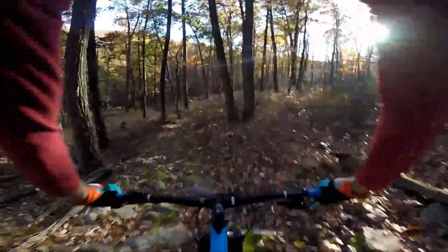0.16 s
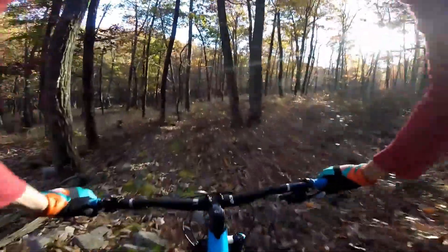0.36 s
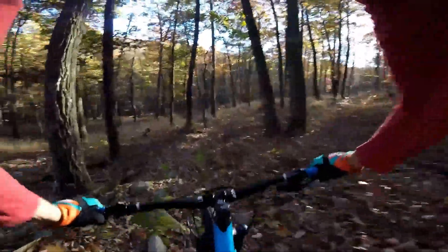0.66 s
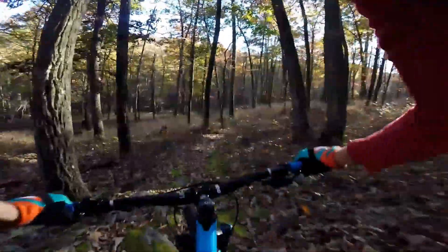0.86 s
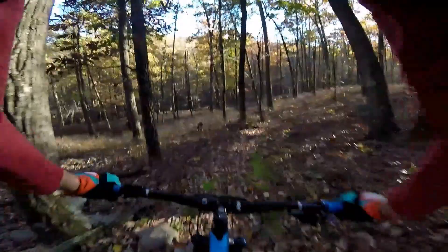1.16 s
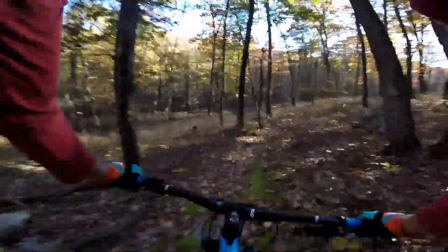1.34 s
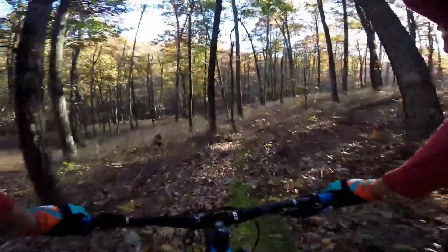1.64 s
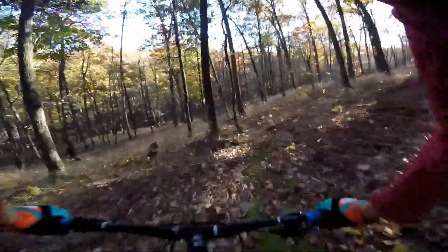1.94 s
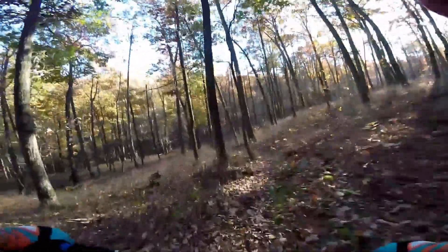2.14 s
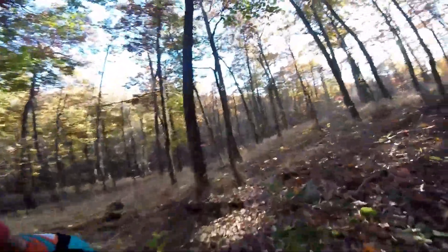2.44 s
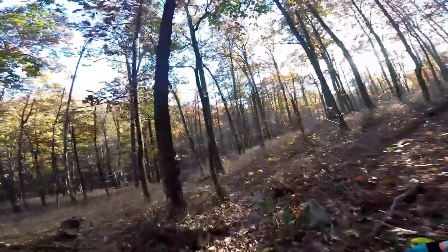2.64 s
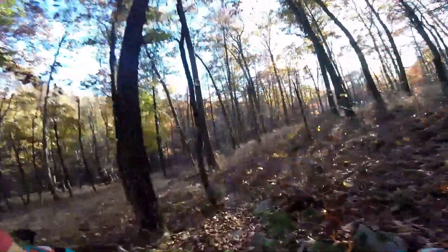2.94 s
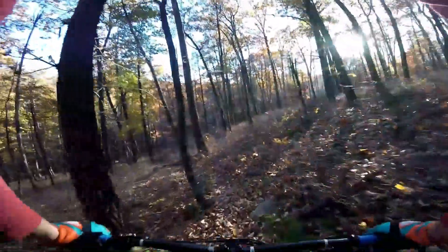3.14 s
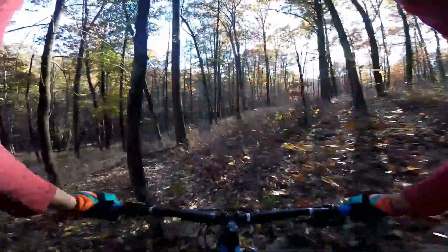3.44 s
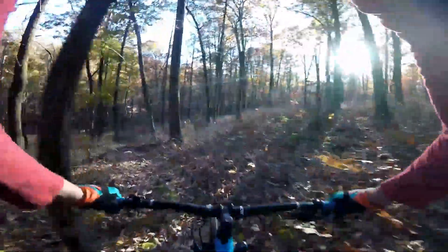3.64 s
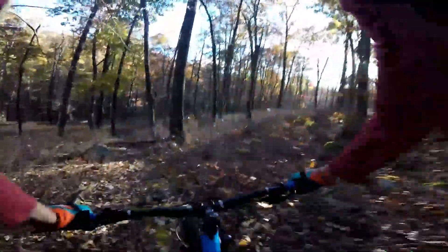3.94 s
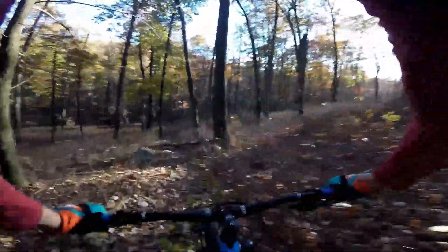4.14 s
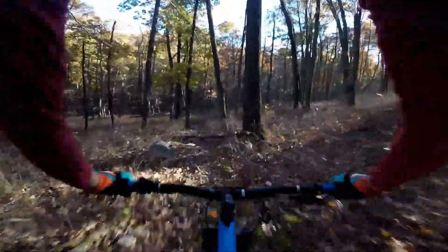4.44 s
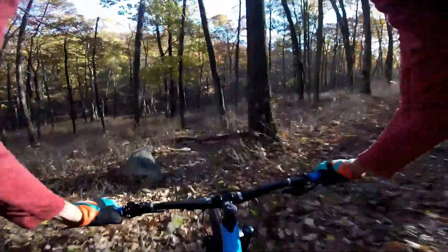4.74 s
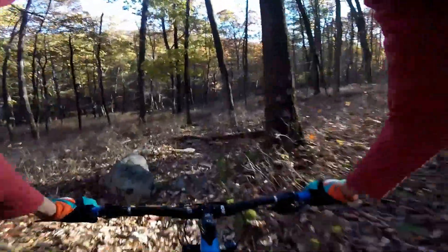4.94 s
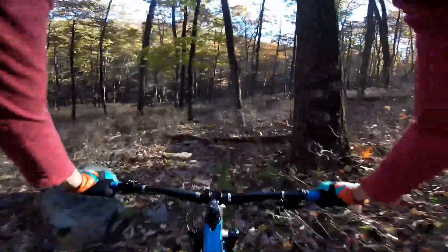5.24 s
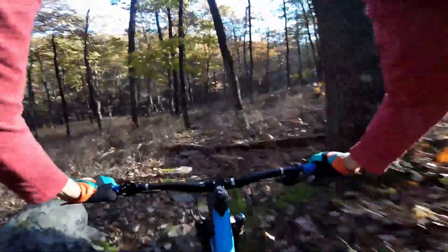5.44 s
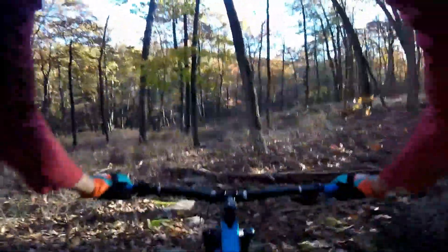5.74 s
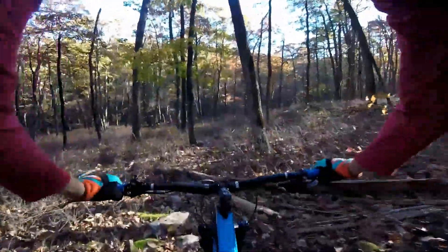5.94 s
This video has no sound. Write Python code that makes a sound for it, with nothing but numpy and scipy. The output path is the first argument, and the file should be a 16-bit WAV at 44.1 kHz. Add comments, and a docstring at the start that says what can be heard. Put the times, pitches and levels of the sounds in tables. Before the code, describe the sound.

A mountain bike descends a rough woodland trail, heard from the rider's chest. Deep, fluttering wind gusts press on the microphone over a dull shaking. Brittle leaves crackle in irregular surges with snapping twigs, gritty scuffs and pattering soil. Early crunching is dense, the middle is lighter with more low thumps, and later come clustered wheel knocks and sharp leafy bursts, with a light frame rattle.

```python
"""Wind buffets the microphone over a low shaking, then tyres crunch down a rocky forest trail in dry leaves.
The place is heard from the chest of a mountain biker, with tyres, bike and wind all close to one microphone.
Leaves, stalks, soil and grit are showers of random clicks ringing in filter bands; twigs, knocks and bumps
are short damped tones mixed with noise; chain and cables are tapped resonances.
Headwind is deep filtered noise, and each gust a swell of a wandering low tone."""
import sys
import numpy as np
from scipy import signal
from scipy.fft import rfft, irfft, next_fast_len
from scipy.io import wavfile
from scipy.ndimage import uniform_filter1d

SR = 44100
rng = np.random.default_rng(int(sys.argv[2]) if len(sys.argv) > 2 else 0)


def bounce(signal):
    """Save signal as a 16-bit WAV file at the path given by the first command-line argument."""
    frames = np.transpose(np.atleast_2d(signal))
    limited = np.clip(frames, -1, 1)
    pcm = np.round(limited * 32767).astype(np.int16)
    wavfile.write(sys.argv[1], SR, pcm)


N = 268613  # length [samples]

# All levels are relative: a layer may trim or filter them further.
# Widths run from the middle of a swell to where its gain has fallen to exp(-2).

# steady headwind: (time [s], level [dB])
WIND_LEVEL = [(0, -42.5), (.8, -33), (1.7, -38.5), (2.3, -31.5), (2.9, -37), (3.35, -37.5), (3.7, -35.5),
              (4.3, -32.5), (4.8, -31), (5.3, -32.5), (5.95, -38.5), (6.09, -44)]
# wind eddies: (frequency [Hz], density [dB per Hz])
WIND_SPECTRUM = [(5, -11), (14, 7), (24, 1.5), (31, -12.5), (42, -5), (65, -7), (105, -16.5), (160, -32.5),
                 (400, -73.5)]
# gusts buffet the microphone: (middle [s], level [dB], width [s])
GUST_SWELLS = [(.092, -25, 0.13), (.295, -19, 0.019), (.486, -27.5, 0.081), (.87, -32, .05),
               (.997, -22, 0.049), (1.176, -20.5, 0.054), (1.359, -19, 0.045), (1.52, -30.5, 0.14),
               (1.759, -24, 0.09), (1.883, -26, .07), (2.04, -21, .035), (2.11, -18.5, 0.018),
               (2.439, -24.5, 0.057), (2.58, -20, 0.055), (2.644, -27, 0.028), (2.822, -22, 0.06),
               (2.974, -20.5, .026), (3.073, -22, 0.026), (3.147, -21, 0.086), (3.567, -23.5, 0.065),
               (3.693, -16, 0.031), (4.02, -20.5, 0.079), (4.13, -22, 0.037), (4.465, -22, 0.026),
               (4.59, -22.5, 0.068), (4.637, -20.5, 0.065), (4.69, -18, 0.065), (4.758, -23, 0.031),
               (4.96, -29, 0.049), (5.089, -20.5, .055), (5.31, -26, 0.036), (5.45, -27.5, 0.13),
               (5.616, -16.5, 0.028), (5.73, -28, .05)]
GUST_HZ, GUST_WANDER_OCTAVES = 34.9, 0.5  # central pitch, spread of its wander

# shaking of frame and rider: (time [s], level [dB])
RUMBLE_LEVEL = [(0, -29), (.8, -50), (1.02, -23), (1.27, -38), (1.65, -30.5), (2.1, -36), (2.5, -35),
                (2.85, -40), (3.4, -30), (3.85, -35.5), (4.4, -26.5), (5.3, -31.5), (5.65, -41.5),
                (5.97, -45), (6.06, -24)]
# shaking of frame and rider: (frequency [Hz], density [dB per Hz])
RUMBLE_SPECTRUM = [(40, -8.5), (100, 4), (150, -1.5), (200, -10.5), (245, -1), (310, -24), (600, -16),
                   (3000, -104)]

# how hard the rolling tyres churn the leaves: (time [s], crunch level [dB])
ROLLING_CRUNCH = [(0.0, -41.5), (0.13, -30), (0.32, -41.5), (0.5, -29), (0.86, -39.5), (0.9, -35),
                  (1.44, -31), (1.64, -42), (1.87, -31.5), (2.29, -36.5), (2.63, -39.5), (3.68, -35),
                  (4.18, -35), (4.45, -37), (4.85, -38.5), (5.37, -30.5), (5.51, -41), (5.85, -45),
                  (5.93, -46), (6.0, -41), (6.09, -42.5)]
# a tyre ploughs into a heap of leaves: (middle [s], level [dB], width [s])
LEAF_HEAPS = [(.151, -40, 0.0099), (.414, -30, 0.032), (.519, -30.5, 0.072), (.61, -28.5, 0.03),
              (.925, -29.5, 0.031), (.975, -27.5, 0.054), (1.104, -27, 0.04), (1.168, -25, 0.023),
              (1.42, -28.5, 0.033), (1.482, -27, 0.019), (1.699, -27, 0.051), (1.858, -27.5, 0.035),
              (2.029, -31, 0.046), (2.1, -30, 0.018), (2.206, -29, 0.02), (2.342, -30.5, 0.055),
              (2.505, -33.5, 0.062), (2.79, -50, 0.047), (2.955, -34, 0.14), (3.148, -35, 0.028),
              (3.23, -34, 0.025), (3.32, -37.5, 0.032), (3.395, -35, 0.019), (3.485, -27.5, 0.021),
              (3.604, -33.5, 0.17), (3.769, -27, 0.031), (3.931, -28, 0.026), (4.018, -26.5, 0.021),
              (4.048, -27, 0.025), (4.357, -23.5, 0.011), (4.395, -29, 0.029), (4.437, -36, 0.018),
              (4.632, -27.5, 0.052), (4.693, -29.5, 0.012), (4.756, -26, 0.0079), (4.925, -29, 0.041),
              (5.055, -26.5, 0.013), (5.137, -29, 0.032), (5.26, -30, 0.081), (5.602, -24.5, 0.036),
              (5.69, -33.5, 0.24), (5.807, -27, 0.02), (6.018, -33, 0.02)]
# dry leaves: (frequency [Hz], density [dB per Hz])
LEAF_SPECTRUM = [(500, -6), (1250, -8.5), (1650, -2), (2350, -1.5), (3100, -2.5), (4200, -5), (4900, -2.5),
                 (6000, -8.5), (7100, -5.5), (8800, -12.5), (10400, -13.5), (11800, -30), (13500, -24),
                 (16000, -35)]
# treble of the crunch: (time [s], gain [dB])
CRUNCH_TREBLE = [(0, -4), (.6, -3), (.8, -8), (1.05, -3), (1.8, -2), (2.3, -5), (3.3, -2.5), (3.65, 1),
                 (4.0, -4.5), (4.18, -2), (5.0, -1.5), (6.09, -2)]
# patches where the leaves thin out: (middle [s], bareness [dB against fully bare], width [s])
BARE_PATCHES = [(.835, -7, 0.027), (1.605, -5, 0.02), (3.36, -6, 0.027), (4.271, -5, .028),
                (4.514, -4, .022), (5.492, -15, 0.013)]
BARE_DB, BARE_TREBLE_DB = -4.5, -23  # fully bare: change of rolling crunch, further change of all treble
RUSTLE_SHARE = 0.35  # smooth rustle beside the cracks of the rolling tyres

# soil and gravel: (frequency [Hz], density [dB per Hz])
GROUND_SPECTRUM = [(90, -15.5), (180, 2.5), (250, 1.5), (400, 1), (700, -4), (1050, -7.5), (1400, -15.5),
                   (6000, -61)]
USUAL_CRUNCH_DB = -36
GROUND_DB, GROUND_FOLLOWS = -44, 0.84  # soil at the usual crunch; its share of the crunch's swing in dB

# chain, cables and frame: (frequency [Hz], strength [dB], t60 [s])
RATTLE_RESONANCES = [(1039, 13.5, 0.044), (2100, 21.5, 0.032), (2326, 24, 0.033), (2657, 15, 0.067)]

# stones and roots knock on the wheels: (time [s], level [dB], pitch at the crest [Hz], t60 [s])
WHEEL_KNOCKS = [(0.145, -26.5, 1030, 0.019), (.242, -27, 378, 0.0055), (0.786, -23.5, 309, 0.022),
                (1.008, -26, 464, 0.0069), (1.066, -29, 264, 0.025), (1.3231, -17, 680, 0.0053),
                (1.472, -19, 207, 0.02), (1.767, -28, 336, 0.0067), (2.1905, -18.5, 560, 0.0038),
                (2.504, -35, 385, 0.0089), (2.805, -27.5, 217, 0.013), (3.053, -33.5, 195, 0.026),
                (3.342, -27, 323, 0.012), (3.391, -25.5, 357, 0.0095), (3.394, -32, 252, 0.039),
                (3.759, -28, 416, 0.0092), (3.904, -25, 774, 0.0049), (3.937, -23.5, 368, 0.0071),
                (4.354, -24.5, 434, 0.0056), (4.44, -24.5, 355, 0.02), (4.555, -26, 437, 0.0074),
                (4.687, -25, 780, 0.0049), (4.748, -19, 393, 0.0081), (4.7616, -15, 540, 0.0063),
                (4.764, -26.5, 273, 0.0355), (4.902, -21, 398, 0.006), (4.963, -29, 222, 0.017),
                (5.333, -25.5, 473, 0.015), (5.393, -29, 433, 0.0055), (5.597, -28.5, 276, 0.028),
                (5.818, -26, 517, 0.0048), (5.8204, -26, 1250, 0.0037), (5.8208, -17, 363, 0.0077),
                (5.823, -27.5, 221, 0.026), (6.031, -29.5, 480, 0.0097), (6.066, -30, 348, 0.01)]

# twigs snap: (time [s], level [dB], pitch at the crest [Hz], t60 [s])
TWIG_SNAPS = [(.2877, -32, 2200, 0.0053), (.409, -21.5, 1730, 0.0057), (0.412, -19, 5230, 0.0021),
              (.42, -25, 5440, 0.0019), (0.468, -24, 1980, .014), (.541, -23, 2770, 0.0041),
              (0.788, -34, 2100, 0.0064), (.8165, -38, 2100, .004), (0.8968, -24, 1820, 0.0066),
              (0.9247, -19.5, 1970, 0.006), (0.971, -19.5, 2680, 0.0047), (1.006, -24, 2340, 0.0061),
              (1.0668, -32, 1990, 0.0044), (1.1632, -20, 2180, 0.0048), (1.169, -32, 3620, 0.0014),
              (1.2764, -25.5, 2280, 0.0044), (1.405, -24, 5550, 0.0016), (1.4275, -25.5, 1800, 0.0083),
              (1.4835, -21.5, 6530, .002), (1.5748, -28, 2440, 0.0062), (1.646, -27.5, 2380, 0.0035),
              (1.6957, -21, 2300, 0.0047), (1.7388, -27.5, 2190, .004), (1.7842, -29, 2390, 0.0036),
              (2.0805, -29, 3470, 0.0032), (2.1535, -27, 2000, .004), (2.1921, -25.5, 2120, 0.0056),
              (2.2543, -29, 5000, 0.0014), (2.6797, -33, 2340, 0.0051), (2.7122, -30, 5200, .002),
              (2.7586, -28, 2200, 0.0037), (2.772, -29, 4800, 0.0022), (2.8119, -25.5, 1980, 0.0066),
              (2.991, -25.5, 2340, 0.0075), (3.1596, -26, 2220, 0.0041), (3.1698, -30, 5000, 0.0023),
              (3.3072, -23, 2140, 0.0031), (3.546, -26.5, 2280, 0.0032), (3.6086, -24.5, 2200, 0.0041),
              (3.76, -21.5, 2360, 0.0029), (3.904, -23, 2600, 0.0027), (3.9276, -27, 5000, 0.0029),
              (4.0122, -21, 3300, 0.0043), (4.041, -21.5, 3450, .006), (4.05, -22, 3400, 0.0057),
              (4.1558, -29, 2100, 0.0043), (4.2985, -32, 2300, 0.012), (4.355, -24, 2070, 0.0044),
              (4.687, -28, 1700, 0.0043), (4.7485, -33, 1800, 0.0045), (4.756, -30, 5550, 0.0026),
              (4.7592, -33, 2500, 0.0037), (5.013, -26, 1700, 0.011), (5.137, -28, 2820, 0.0041),
              (5.5727, -28, 2300, 0.0037), (5.595, -20, 1730, 0.0055), (5.604, -22, 2600, 0.0022),
              (5.8568, -35, 2370, .005), (6.0158, -26.5, 5900, .006)]

# a tyre grinds through dry stalks: (middle [s], level [dB], width [s])
STALK_SWELLS = [(.513, -28.5, .022), (.588, -31, .022), (.947, -29, 0.02), (.99, -33.5, .03),
                (1.103, -32, .018), (1.176, -29, 0.0092), (1.705, -28.5, 0.038), (1.862, -30, 0.059),
                (2.103, -33, 0.04), (2.34, -33.5, .025), (2.941, -31, 0.019), (3.158, -32, 0.052),
                (3.608, -35, 0.044), (4.154, -39, 0.022), (4.926, -39, .03), (5.29, -31, 0.058),
                (5.358, -30, .018)]
STALK_LOW_HZ, STALK_TOP_HZ = 1460, 2610

# a tyre scuffs over grit: (middle [s], level [dB], width [s])
GRIT_SCUFFS = [(.635, -34.5, 0.03), (1.85, -37, 0.046), (2.34, -52, 0.021), (3.87, -39, 0.024),
               (4.04, -37, 0.024), (4.44, -39.5, 0.03), (4.69, -37, 0.017), (4.98, -38.5, 0.034),
               (5.28, -41, 0.065)]

# bumps that reach the rider's body: (time [s], level [dB], pitch at the crest [Hz])
BODY_BUMPS = [(0.957, -38, 104), (1.549, -21, 84), (1.649, -23, 92), (1.974, -23, 102), (2.294, -26, 95),
              (2.362, -21.5, 68.4), (2.408, -17.5, 103), (2.433, -18.5, 66.6), (2.528, -30, 95),
              (2.617, -20.5, 86.5), (2.866, -25, 85.4), (2.976, -21.5, 92), (3.05, -20, 86),
              (3.144, -19.5, 121), (3.222, -21, 90), (3.317, -24, 114), (3.401, -24, 114),
              (3.624, -22.5, 134), (3.702, -25.5, 87), (3.82, -22, 78), (3.934, -26, 97), (4.005, -19, 90),
              (4.091, -28, 98), (4.235, -15.5, 110), (4.331, -23, 104), (4.388, -23.5, 116),
              (4.565, -22, 91), (4.689, -26, 92), (4.745, -23.5, 118), (4.961, -15.5, 105),
              (5.117, -26, 92), (5.399, -31.5, 126.7), (5.479, -29, 90), (5.598, -26, 114),
              (5.651, -18.5, 98), (5.831, -21, 108), (6.047, -26, 100)]

CUTOFF_HZ = 15600


def from_db(db):
    """Decibels to gain."""
    return 10 ** (np.asarray(db) / 20)


def rms_one(x):
    """Scale to rms 1."""
    return x / np.sqrt(np.mean(x ** 2) + 1e-20)


def in_time(rows):
    """Level at every sample from (time [s], level [dB]) rows, joined by straight lines."""
    s, level_db = np.transpose(rows)
    return np.interp(np.arange(N) / SR, s, level_db)


def swells(rows):
    """Gain of bell-shaped swells from (middle [s], level [dB], width [s]) rows; their powers add."""
    t, power = np.arange(N) / SR, np.zeros(N)
    for s, db, width in rows:
        near = slice(*np.searchsorted(t, [s - 2 * width, s + 2 * width]))
        bell = np.exp(-2 * ((t[near] - s) / width) ** 2)
        power[near] += (from_db(db) * bell) ** 2
    return np.sqrt(power)


def drift(rate):
    """Smooth chance with spread 1 that changes about rate times a second."""
    step = 40  # samples between slow values
    r = np.exp(-2 * np.pi * rate * step / SR)
    settle = 2000  # slow values dropped while the filter settles
    noise = rng.standard_normal(N // step + settle + 2)
    slow = signal.lfilter([1], [1, -2 * r, r * r], noise)[settle:]
    return np.interp(np.arange(N) / step, np.arange(len(slow)), rms_one(slow))


def evened(x, span_s):
    """Hold the rms near 1 over the given span, leaving faster detail alone."""
    size = int(span_s * SR / 2) + 1
    power = uniform_filter1d(uniform_filter1d(x * x, size), size)
    return x / np.sqrt(power + 1e-12)


def filtered(x, order, hz, kind="low"):
    """Causal Butterworth filter."""
    return signal.sosfilt(signal.butter(order, hz, kind, fs=SR, output="sos"), x)


def coloured(x, spectrum):
    """Causal (minimum-phase) filter with the given spectrum, built from its folded cepstrum."""
    size = 2 * next_fast_len(N // 2 + SR // 4)
    hz, db = np.transpose(spectrum)
    bins_hz = np.fft.rfftfreq(size, 1 / SR)
    gain = from_db(np.interp(np.log(bins_hz + 1), np.log(hz), db))
    cepstrum = irfft(np.log(gain))
    cepstrum[1:size // 2] *= 2
    cepstrum[size // 2 + 1:] = 0
    return irfft(rfft(x, size) * np.exp(rfft(cepstrum)))[:N]


def clicks(per_s, spread_db):
    """Random clicks: a positive spread gives a few loud ones, a negative spread a few faint ones."""
    sizes = from_db(spread_db * np.minimum(rng.exponential(1, N), 4))
    return (rng.random(N) < per_s / SR) * sizes


def grains(train, low_hz, high_hz, patchy_db, count):
    """Each click rings a row of bands with its own strengths, hence its own pitch; bands vary in patches."""
    edges = np.geomspace(low_hz, high_hz, count + 1)
    out = 0
    for band in zip(edges, edges[1:]):
        struck = train * rng.standard_normal(N) * from_db(patchy_db * drift(16.4))
        out = out + filtered(struck + 1e-18, 2, band, "band")
    return rms_one(out)


def add(out, s, sound):
    """Mix a sound in at time s."""
    start = max(int(s * SR), 0)
    out[start:start + len(sound)] += sound[:max(N - start, 0)]


def fading(length, fall_s):
    """Exponential decay over length samples, falling to 1/e in fall_s."""
    return np.exp(-np.arange(length) / SR / fall_s)


def blow(hz, t60, rough, sag, softness):
    """Damped tone and noise: soft contact swells more roundly, pitch sags, rough is noise against tone."""
    t = np.arange(SR // 4) / SR
    noise = filtered(rng.standard_normal(len(t)), 2, [hz / 2, hz * 1.11], "band")
    age = np.log(1000) * t / (t60 * softness)  # 1 at the crest
    shape = (age * np.exp(1 - age)) ** softness
    turns = np.cumsum(hz * ((1 + age) / 2) ** -sag) / SR
    crest_turns = np.interp(1, age, turns)
    tone = shape * np.cos(2 * np.pi * (turns - crest_turns))
    roughness = rough * tone.std() * rms_one(shape * noise)
    return (tone + roughness) / np.hypot(1, rough)


def wind(steady_db, gust_db):
    """Slow, lumpy eddies press on the microphone; each gust is a separate deep buffet of a low tone."""
    eddies = coloured(rng.standard_normal(N), WIND_SPECTRUM)
    steady = from_db(in_time(WIND_LEVEL) + steady_db) * evened(eddies, 0.36)
    pitch_hz = GUST_HZ * 2 ** (GUST_WANDER_OCTAVES * drift(21.6))
    buffet = rms_one(np.cos(2 * np.pi * np.cumsum(pitch_hz) / SR))
    return steady + from_db(gust_db) * swells(GUST_SWELLS) * buffet


def rumble(trim_db):
    """Uneven ground shakes the frame and the rider in small, dull lumps."""
    lumps = clicks(per_s=150, spread_db=-2.5) * rng.standard_normal(N)
    level = from_db(in_time(RUMBLE_LEVEL) + trim_db)
    return level * evened(coloured(lumps, RUMBLE_SPECTRUM), 0.21)


def bareness():
    """0 in the leaves, 1 for a fully bare patch."""
    return swells(BARE_PATCHES)


def rolling_level():
    """Crunch of the rolling tyres in dB, lower over bare patches."""
    return in_time(ROLLING_CRUNCH) + BARE_DB * bareness()


def tyre_load():
    """How hard the tyres churn, rolling and ploughing together, as a gain."""
    return np.hypot(from_db(rolling_level()), swells(LEAF_HEAPS))


def ticks(per_s, spread_db):
    """Brittle leaves and stems give single sharp ticks: each is one impulse, dull or bright by chance."""
    out = 0
    tops_hz = [2500, 5000, 15000]
    for hz in tops_hz:
        train = clicks(per_s / len(tops_hz), spread_db) * rng.choice([-1, 1], N)
        out = out + rms_one(filtered(train + 1e-18, 1, hz))
    return rms_one(out)


def crackle(per_s, spread_db, clump_db, hiss, patchy_db, ticks_per_s, tick_db):
    """Leaves break in clumps of tiny cracks and sharper ticks, over a smooth rustle."""
    clumps = from_db(clump_db * drift(16.0) + 0.35 * drift(240))
    cracks_and_rustle = (rms_one(clicks(per_s, spread_db)) + hiss) * clumps
    fine = grains(cracks_and_rustle, 500, 17000, patchy_db, count=30)
    sharp = filtered(ticks(ticks_per_s, spread_db=-1.3), 2, 700, "high")
    return coloured(fine + from_db(tick_db) * rms_one(sharp * clumps), LEAF_SPECTRUM)


def leaves(rolling_db, ploughing_db):
    """The steady crunch swells in each heap and turns dull over bare patches."""
    steady = crackle(per_s=2000, spread_db=-2.0, clump_db=3.0, hiss=RUSTLE_SHARE,
                     patchy_db=3.5, ticks_per_s=380, tick_db=-9.5)
    rolling = from_db(rolling_level() + rolling_db) * evened(steady, 0.085)
    heaped = crackle(per_s=4900, spread_db=0.5, clump_db=5.0, hiss=0.39,
                     patchy_db=1.0, ticks_per_s=600, tick_db=-6.5)
    ploughing = from_db(ploughing_db) * swells(LEAF_HEAPS) * evened(heaped, 0.026)
    crunch = rolling + ploughing
    # zero-phase high-pass, so that the treble can be turned down in place
    treble = signal.sosfiltfilt(signal.butter(2, 3800, "high", fs=SR, output="sos"), crunch)
    treble_db = in_time(CRUNCH_TREBLE) + BARE_TREBLE_DB * bareness()
    return crunch + treble * (from_db(treble_db) - 1)


def ground(lumpy_db):
    """Tread blocks and loose stones patter dully and unevenly on the soil, louder as the tyres work harder."""
    effort = tyre_load() / from_db(USUAL_CRUNCH_DB)
    stones = rms_one(clicks(per_s=600, spread_db=-0.5)) + 0.23
    patter = coloured(grains(stones, 78.6, 2700, patchy_db=3.5, count=10), GROUND_SPECTRUM)
    level = from_db(GROUND_DB + lumpy_db * drift(0.95)) * effort ** GROUND_FOLLOWS
    return level * evened(patter, 0.72)


def stems(level_db):
    """Small stems snap at random under the tyres, following the rolling crunch."""
    snaps = grains(clicks(per_s=70, spread_db=2.5), 1293, 2760, patchy_db=1.0, count=5)
    return from_db(level_db + rolling_level()) * snaps


def rattle(level_db, per_s, spread_db, jolt):
    """Chain and cables tap the frame, harder as the tyres churn and just after each knock."""
    shaking = tyre_load()
    for s, db, hz, t60 in WHEEL_KNOCKS:
        add(shaking, s, jolt * from_db(db) * fading(SR // 4, 0.0097))
    taps, out = clicks(per_s, spread_db), 0
    for hz, db, t60 in RATTLE_RESONANCES:
        r = np.exp(-np.log(1000) / (t60 * SR))
        w = 2 * np.pi * hz / SR
        struck = taps * rng.standard_normal(N) + 1e-18
        ringing = signal.lfilter([0, np.sin(w)], [1, -2 * r * np.cos(w), r * r], struck)
        out = out + from_db(db) * ringing
    return from_db(level_db) * shaking * evened(out, 0.15)


def knocks(shudder_db, shudder_s):
    """Stones and roots knock hollowly on the wheels, each leaving a brief dull shudder in the bike."""
    out, shudder = np.zeros(N), np.zeros(N)
    for s, db, hz, t60 in WHEEL_KNOCKS:
        add(out, s, from_db(db) * blow(hz, t60, rough=0.69, sag=0.37, softness=2.027))
        add(shudder, s, from_db(db + shudder_db) * fading(SR // 4, shudder_s))
    dull_noise = coloured(rng.standard_normal(N), GROUND_SPECTRUM)
    return out + shudder * evened(dull_noise, 0.022)


def twigs(top_hz):
    """Twigs crack sharply as damped tones and splinter for a moment as fading noise."""
    cracks, splintering = np.zeros(N), np.zeros(N)
    for s, db, hz, t60 in TWIG_SNAPS:
        add(cracks, s, from_db(db) * blow(hz, t60, rough=0.7, sag=0.1, softness=1))
        add(splintering, s, from_db(db - 6.5) * fading(SR // 10, 0.003))
    splinters = splintering * rms_one(coloured(rng.standard_normal(N), LEAF_SPECTRUM))
    return filtered(cracks, 2, top_hz) + splinters


def stalks(level_db):
    """Crushed stalks break in coarse, woody clusters whose pitch shifts from one patch to the next."""
    train = clicks(per_s=600, spread_db=3.0)
    cracks = grains(train, STALK_LOW_HZ, STALK_TOP_HZ, patchy_db=6.5, count=5)
    return from_db(level_db + 1.5 * drift(70.0)) * swells(STALK_SWELLS) * evened(cracks, 0.013)


def scuffs():
    """Grit grinds under the tread in short, coarse scrapes."""
    grit = grains(clicks(per_s=1400, spread_db=-2.0), 530, 1240, patchy_db=8.0, count=4)
    return swells(GRIT_SCUFFS) * evened(grit, 0.06)


def bumps():
    """Bumps thud softly through the rider's body as low damped tones."""
    out = np.zeros(N)
    for s, db, hz in BODY_BUMPS:
        add(out, s, from_db(db) * blow(hz, t60=0.042, rough=0.34, sag=0.4, softness=1.05))
    return out


def scene():
    """Tyres, bike and wind, all close to one microphone."""
    air = wind(steady_db=7.0, gust_db=-2.5)
    tyres = leaves(rolling_db=-2.5, ploughing_db=-3.5) + ground(lumpy_db=1.0) + stems(level_db=-13.5)
    tyres = tyres + twigs(top_hz=6300) + stalks(level_db=-5.0) + scuffs()
    bike = rumble(trim_db=-9.0) + rattle(level_db=-14.5, per_s=97, spread_db=4.5, jolt=0.025)
    bike = bike + knocks(shudder_db=-17.5, shudder_s=0.011) + bumps()
    return (air + tyres + bike)[None]


def record(dry):
    """A steep elliptic low-pass cuts the top."""
    return signal.sosfilt(signal.ellip(10, 0.2, 80, CUTOFF_HZ, fs=SR, output="sos"), dry)


dry = scene()
out = record(dry)
bounce(out)
```